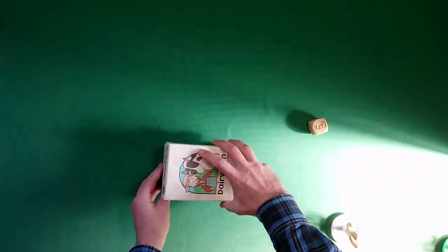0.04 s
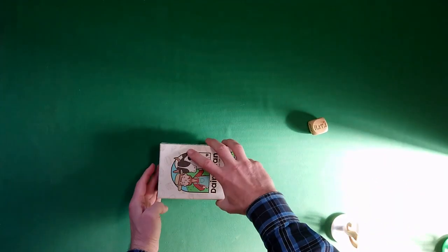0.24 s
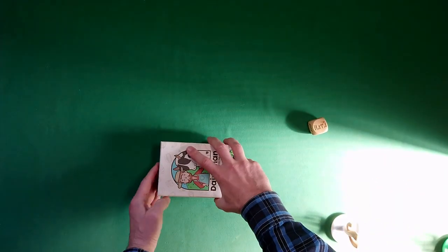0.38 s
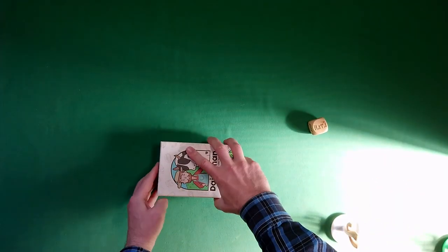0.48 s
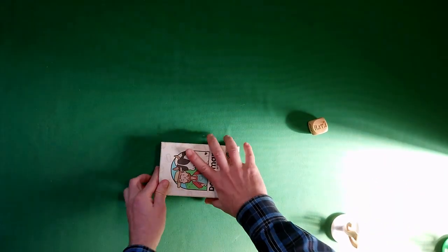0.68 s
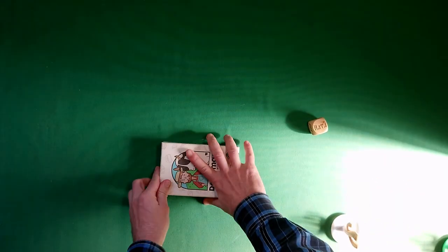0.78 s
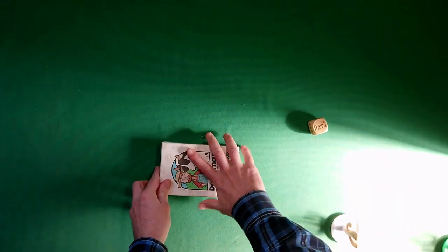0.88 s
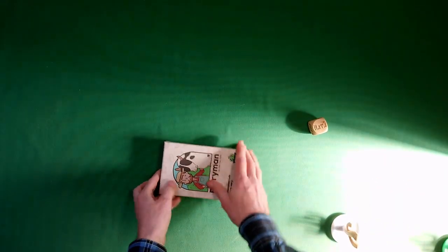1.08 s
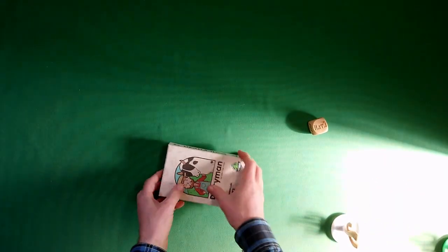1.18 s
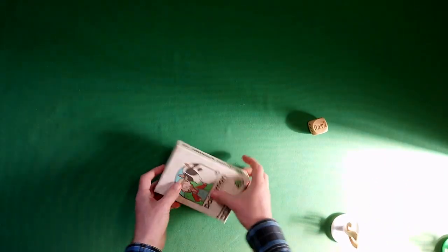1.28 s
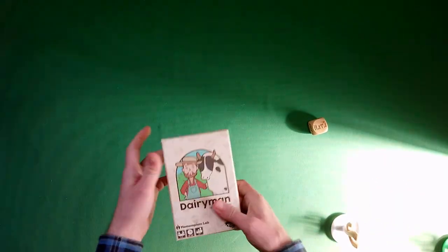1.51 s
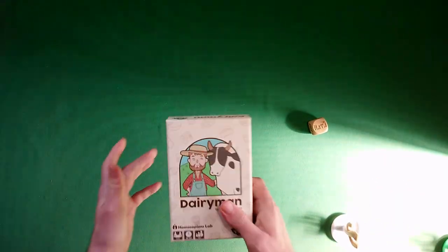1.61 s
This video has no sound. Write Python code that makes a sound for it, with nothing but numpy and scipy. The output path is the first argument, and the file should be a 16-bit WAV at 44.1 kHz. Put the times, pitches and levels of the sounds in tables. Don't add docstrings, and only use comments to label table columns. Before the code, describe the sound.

Hollow cardboard box being closed with taps, a rub and knocks, then turned in the hands

```python
import sys
import numpy as np
from scipy import signal
from scipy.fft import rfft, irfft, next_fast_len
from scipy.io import wavfile
from scipy.ndimage import uniform_filter1d

SR = 44100
rng = np.random.default_rng(int(sys.argv[2]) if len(sys.argv) > 2 else 0)


def inscribe(sig):
    pcm = np.round(np.clip(np.atleast_2d(sig).T, -1, 1) * 32767)
    wavfile.write(sys.argv[1], SR, pcm.astype(np.int16))


def ratio_of_db(decibels):
    return 10 ** (np.asarray(decibels, float) / 20)


N = 72765
LAG_S = 0.00033
BOX_LOW_HZ = 220


def evened(x):
    return x / np.sqrt(np.mean(x ** 2) + 1e-20)


def read(points, hz):
    f, value = np.transpose(points)
    return np.interp(np.log(hz + 1), np.log(f + 1), value)


def follow(curve):
    s, db = np.transpose(curve)
    return ratio_of_db(np.interp(np.arange(N) / SR, s, db))


def add(mix, s, sound):
    part = mix[max(round(s * SR), 0):][:len(sound)]
    part += sound[:len(part)]


def colour(x, table):
    size = next_fast_len(x.shape[-1])
    gain = ratio_of_db(read(table, np.fft.rfftfreq(size, 1 / SR)))
    return irfft(rfft(x, size) * gain, size)[..., :x.shape[-1]]


def highs(x, hz):
    return signal.sosfilt(signal.butter(N=2, Wn=hz, btype="high", fs=SR, output="sos"), x)


def ring(x, hz, width):
    r = np.exp(-np.pi * width / SR)
    poles = [1, -2 * r * np.cos(2 * np.pi * hz / SR), r * r]
    return signal.lfilter([(1 - r * r) / 2, 0, (r * r - 1) / 2], poles, x)


def spot(f, hz, db, octaves):
    return db * np.exp(-(np.log2(f / hz) / octaves) ** 2)


def slips(length, per_s, spread_db):
    hit, size, sign = rng.random((length, 3)).T
    strength = ratio_of_db(-spread_db * np.log(size + 0.025))
    return evened((hit < per_s / SR) * strength * np.sign(sign - .5))


def room_floor():
    # frequency in Hz, level in dB per Hz.
    floor_colour = [(30, 19.5), (80, 19), (200, -14), (400, 3), (1000, 2), (2300, -46), (9000, -31),
                    (11500, -99)]
    noise = rng.standard_normal((2, N))
    return ratio_of_db(-57) * evened(colour(noise + .5 * noise[0], floor_colour))


def shifting_weight():
    # time in seconds, load in dB.
    load = [(0, -52), (.05, -49.5), (.15, -49), (.25, -42), (.5, -47), (.7, -41.5), (.86, -41), (.91, -51),
            (1.0, -52), (1.1, -43.5), (1.25, -41), (1.4, -59), (1.65, -74)]
    # frequency in Hz, level in dB per Hz.
    rumble = [(15, -89), (25, -20), (71, 4), (330, -9.5), (403, -6), (600, -19.5), (780, -47), (1320, -120)]
    lumps = ratio_of_db(2.7 * evened(uniform_filter1d(rng.standard_normal(N), 900)))
    return lumps * follow(load) * evened(colour(rng.standard_normal(N), rumble))


def rub():
    # time in seconds, pressure in dB.
    pressure = [(0, -49.5), (.06, -57.5), (.11, -58), (.16, -69.5), (.2, -49), (.27, -57.5), (.33, -62.5),
                (.365, -55), (.43, -56.5), (.47, -62.5), (.54, -54.5), (.68, -53.5), (.77, -50.5),
                (.86, -70.5), (1.03, -77), (1.1, -59.5), (1.2, -61.5), (1.28, -65.5)]
    # resonance of the rubbed board in Hz, width in Hz, level in dB.
    board = [(340, 660, 10.5), (700, 330, -46), (1660, 810, 3.5), (2300, 420, 2), (3030, 760, -46),
             (4400, 3800, 2), (7250, 610, -4.5)]
    shared = 0.81
    both, left, right = (slips(N, 4200, 3) for side in range(3))
    grit = shared * np.array([both, np.roll(both, round(LAG_S * SR))]) + [left, right]
    body = 0
    for k, (f, width, db) in enumerate(board):
        body = body + (-1) ** k * ratio_of_db(db) * ring(grit, f, width) / np.sqrt(width)
    return ratio_of_db(11) * follow(pressure + [(1.33, -55.5), (1.65, -71)]) * evened(body)


def swishes():
    # start in seconds, length in seconds, level in dB.
    brushes = [
        (0, .2, -82),
        (0.882, .1, -65.5),
        (1.04, 0.12, -65.5),
        (1.2, 0.081, -62),
        (1.358, .16, -62),
    ]
    # frequency in Hz, level in dB per Hz.
    swish_colour = [(5000, -30), (8000, 2), (10500, -14), (13500, -6), (16000, -10.5)]
    t = np.arange(N) / SR
    swell = sum(ratio_of_db(db) * np.sin(np.pi * np.clip((t - s) / length, 0, 1)) for s, length, db in brushes)
    return swell * evened(colour(rng.standard_normal((2, N)), swish_colour))


def seam_air():
    # time in seconds, flow in dB.
    flow = [(0, -67.5), (.1, -69.5), (.2, -77), (.3, -104), (.47, -101), (.6, -72), (.68, -57.5),
            (.73, -47), (.78, -47.5), (.825, -59.5), (.843, -61), (.856, -66.5), (.92, -76.5), (1.0, -77),
            (1.13, -71.5), (1.42, -68), (1.55, -84), (1.65, -74)]
    # frequency in Hz, level in dB per Hz.
    hiss = [(880, -0.5), (1500, -2.5), (1660, -5.5), (2770, -7.5), (5380, -7), (15100, -21.5),
            (16000, -13.5)]
    return ratio_of_db(14) * follow(flow) * evened(colour(rng.standard_normal((2, N)), hiss))


def thump(db, hz):
    swing_t60, table_hz, table_db, table_t60 = 0.048, 75, -13, 0.088
    t = np.arange(9000) / SR
    swing = ratio_of_db(-60 * t / swing_t60) * np.sin(2 * np.pi * hz * t)
    top = ratio_of_db(table_db - 60 * t / table_t60) * np.sin(2 * np.pi * table_hz * t)
    return -2 * ratio_of_db(db) * (1 - np.exp(-t * hz * 2)) * (swing + top)


def table_thumps(mix):
    # start in seconds, strength in dB, pitch in Hz.
    landings = [(.003, -29, 75), (.219, -32, 93), (.658, -19.5, 122), (.732, -19.5, 102),
                (.745, -26.5, 200), (.760, -47, 116), (.786, -22.5, 96), (.800, -25, 109),
                (.868, -31.5, 115), (.921, -36.5, 196), (1.015, -45, 164), (1.044, -27.5, 184),
                (1.057, -17.5, 150), (1.085, -28, 131), (1.11, -52, 380), (.375, -39, 140),
                (1.185, -20, 138), (1.1895, -24, 307), (1.203, -44, 185), (1.215, -27.5, 154)]
    for s, db, hz in landings:
        add(mix, s, thump(db, hz))


def tap(db, hz, ring_share=1):
    # mode in Hz, level in dB, t60 in seconds.
    box_modes = [(302.2, -1.5, 0.12), (410, 0.5, 0.059), (500, 1.5, 0.048), (575, -6.5, 0.21),
                 (690, 4.5, 0.072), (746, 8, 0.027), (960, 3, 0.039), (1200, -7, 0.11), (1284, 9.5, 0.033),
                 (1660, 8.5, 0.052), (2000, -1, 0.05), (2390, -8.5, 0.087), (3150, -34, 0.025),
                 (3900, -23, .02)]
    contact_turns = 0.17
    flex = .035
    chatter_db, chatter_t60 = -37, 0.1
    t = np.arange(6000) / SR
    modes = 0
    for f, d, t60 in box_modes:
        decay = ratio_of_db(d + spot(f, hz, 20, .3) - 60 * t / t60 / ring_share)
        modes = modes + decay * np.sin(2 * np.pi * f * (1 + flex * rng.uniform(-1.23, 1)) * t)
    blow = np.exp(-(4 * t[:200] * hz / contact_turns - 2) ** 2)
    chatter = slips(3000, 700, 3.0) * ratio_of_db(chatter_db - 60 * t[:3000] / chatter_t60 / ring_share)
    hits = chatter + (t[:3000] == 0)
    sound = highs(signal.fftconvolve(np.convolve(modes, blow), hits), BOX_LOW_HZ)
    return ratio_of_db(db) * sound / abs(sound).max()


def lid_taps(mix):
    # start in seconds, strength in dB, pitch of the struck part in Hz.
    taps = [(.0652, -23, 500), (.0692, -25, 496), (.079, -38, 560), (.090, -30, 520), (.0940, -24.5, 500),
            (.102, -27, 700), (.110, -40.5, 520), (.122, -30, 575), (.131, -40, 560), (.180, -29, 610),
            (.192, -26.5, 402), (.203, -27.5, 560), (.2166, -4.5, 700), (.2195, -15, 340),
            (.2232, -7.5, 410), (.2305, -16.5, 320), (.237, -21, 400), (.245, -16, 656), (.250, -20.5, 690),
            (.2560, -14, 690), (.271, -17, 690), (.281, -22, 614), (.298, -24, 466), (.307, -26.5, 600),
            (.318, -30.5, 500), (.360, -29, 348)]
    for s, db, hz in taps:
        add(mix, s, tap(db, hz))


def tick(db, t60, bright_db):
    # frequency in Hz, level in dB.
    tick_colour = [(1000, -31), (3000, -4), (7500, -15), (11000, -35.5), (16000, -57)]
    shade = [(f, d + bright_db * f / 16000) for f, d in tick_colour]
    return ratio_of_db(db - 60 * np.arange(2000) / SR / t60) * colour(rng.standard_normal(2000), shade)


def edge_ticks(mix):
    # start in seconds, peak in dB, t60 in seconds, extra treble in dB.
    clicks = [(0.0661, -35.5, .04, 15), (0.2045, -48, .05, -5), (0.2180, -26.5, 0.1, 0.5),
              (0.3567, -36, 0.054, 12), (.539, -36, 0.031, 2), (.7662, -33, .015, 6),
              (1.1830, -34, .04, -4), (1.3090, -37, .04, 12), (1.3327, -27.5, .035, 7),
              (1.378, -29, 0.021, 2), (1.3901, -23.5, 0.029, 6.5), (1.403, -29, 0.054, 3),
              (1.5927, -35, .05, -1), (1.645, -34, 0.024, -5)]
    release = [
        (.8407, -38, .014, 40),
    ]
    for s, db, t60, bright_db in clicks + release:
        add(mix, s, tick(db, t60, bright_db))


def jolt(db, contact_s):
    t = np.arange(1500) / SR
    return ratio_of_db(db + 3.5) * highs(np.exp(-(3 * t / contact_s - 3) ** 2), 60)


def corner_jolts(mix):
    # start in seconds, strength in dB, contact in seconds.
    jolts = [
        (.2225, -13.5, 0.0018),
        (.7662, -17, 0.00084),
        (.770, -14.5, 0.00097),
        (.7745, -23.5, 0.0013),
    ]
    for s, db, contact_s in jolts:
        add(mix, s, jolt(db, contact_s))


def pressed_knocks(mix):
    # start in seconds, strength in dB, pitch in Hz.
    knocks = [(.587, -31.5, 377), (.734, -23.5, 395), (.7665, -21.5, 960), (.7709, -39, 556),
              (.7752, -25.5, 382), (.790, -25, 500), (.853, -36, 317), (.918, -41, 298),
              (1.055, -35.5, 613), (1.175, -31.5, 405), (1.182, -29.5, 450), (1.2385, -31.5, 1200)]
    for s, db, hz in knocks:
        add(mix, s, tap(db, hz, ring_share=.4))


def stroke(length, db, hz):
    # mode of the box held in the air in Hz, width in Hz, level in dB.
    held_modes = [(414, 89, 5.5), (745, 81, 0.5), (998, 97, 1), (1293, 170, -0.5), (1650, 53, 0.5),
                  (2000, 300, 0.5), (2260, 305, 1.5), (3420, 1200, -3.5), (4660, 430, -12),
                  (6200, 1100, -40)]
    rise_s, fall_db, first_slip = 0.00023, -5.5, 5
    t = np.arange(6000) / SR
    grit = slips(6000, 2400, 4.5) * np.minimum(t / rise_s, 1) + first_slip * (t == 0)
    grit = highs(grit * ratio_of_db(np.maximum(fall_db * (t / length) ** 2.34, -90)), BOX_LOW_HZ * 2)
    sound = 0
    for k, (f, width, d) in enumerate(held_modes):
        width = max(width, 120)
        level = ratio_of_db(d + spot(f, hz, 8, 0.69)) * np.sqrt(2000 / width)
        sound = sound + (-1) ** k * level * ring(grit, f, width)
    return ratio_of_db(db) * sound


def finger_strokes(mix):
    # start in seconds, length in seconds, strength in dB, loudest part in Hz.
    strokes = [(1.085, 0.022, -50, 2430), (1.285, 0.0047, -47, 590), (1.297, 0.03, -38.5, 1180),
               (1.315, 0.018, -50, 1860), (1.3315, 0.02, -31.5, 1430), (1.352, 0.025, -35.5, 1310),
               (1.380, 0.016, -33, 520), (1.403, 0.016, -37, 1200), (1.425, 0.033, -47.5, 540),
               (1.476, 0.017, -48.5, 1650), (1.5735, 0.019, -46.5, 2250), (1.59, 0.031, -46.5, 2540),
               (1.635, .04, -47.5, 2000)]
    for s, length, db, hz in strokes:
        add(mix, s, stroke(length, db, hz))


def later(x, share):
    # frequency in Hz, share of the lag.
    lag_share = [(150, 2.2), (350, 0.23), (480, 0.68), (700, 1.35), (1000, 1.04), (1400, 1.05)]
    size = next_fast_len(N + 100)
    hz = np.fft.rfftfreq(size, 1 / SR)
    turn = np.exp(-2j * np.pi * hz * share * LAG_S * read(lag_share, hz))
    return irfft(rfft(x, size) * turn, size)[:N]


def room(x):
    # frequency in Hz, t60 in seconds.
    room_t60 = [(200, .05), (700, .05), (2000, .07), (8000, .03)]
    # frequency in Hz, reflected share in dB.
    wet = [(150, -20), (400, -12), (800, -5), (2000, -2), (8000, -2)]
    taps = np.zeros((2, 16000))
    at = np.arange(40, 15980, 5) + rng.integers(0, 5, (2, 3188))
    np.put_along_axis(taps, at, rng.choice([-1., 1.], at.shape), 1)
    hz, t, z = signal.stft(taps, SR, nperseg=256)
    tail = signal.istft(z * ratio_of_db(-60 * t / read(room_t60, hz)[:, None]), SR, nperseg=256)[1]
    tail = tail / np.linalg.norm(tail[0])
    return colour(signal.fftconvolve(x[None], tail, axes=1)[:, :N], wet)


def scene():
    box = shifting_weight()
    for play in (table_thumps, lid_taps, edge_ticks, corner_jolts, pressed_knocks, finger_strokes):
        play(box)
    lift_s = 1.27
    lifted = np.clip((np.arange(N) / SR - lift_s) / .01, 0, 1)
    near = np.array([box, later(box * (1 - lifted), 0.89) + later(box * lifted, .5)])
    return near + room(box) + rub() + seam_air() + swishes() + room_floor()


def roll_off(x):
    return signal.sosfilt(signal.butter(12, 15780, fs=SR, output="sos"), x)


def record(dry):
    # frequency in Hz, left minus right in dB.
    lean = [(60, -3), (130, -5), (290, -1.5), (640, -3.5), (1410, -5), (3100, -3.5), (6820, 4.5),
            (15000, 0)]
    left = colour(dry[0], [(f, d / 2) for f, d in lean])
    right = colour(dry[1], [(f, -d / 2) for f, d in lean])
    return roll_off(highs(np.array([left, right]), 53.6))


dry = scene()
out = record(dry)
inscribe(out)
```